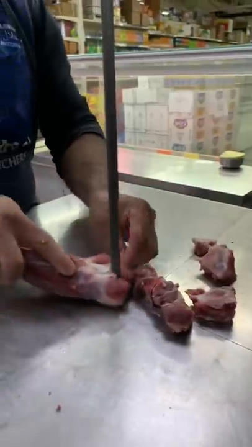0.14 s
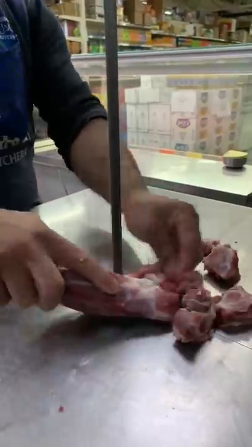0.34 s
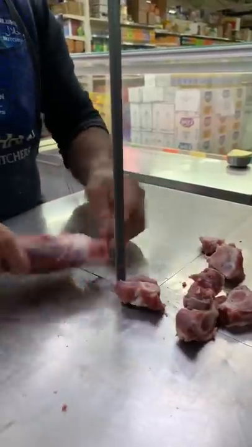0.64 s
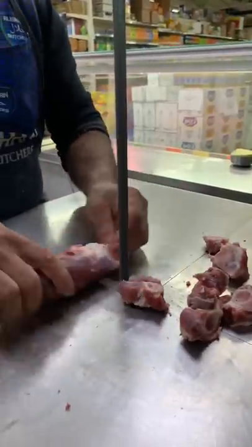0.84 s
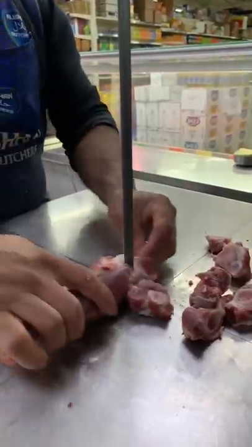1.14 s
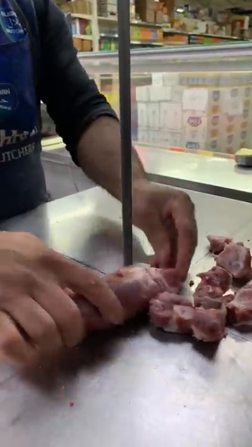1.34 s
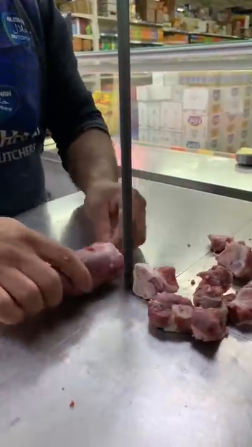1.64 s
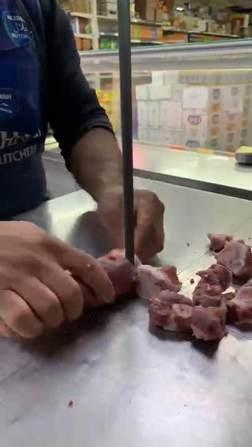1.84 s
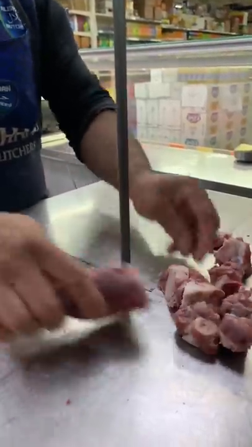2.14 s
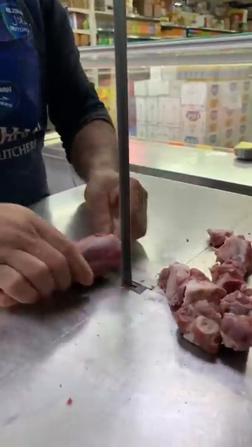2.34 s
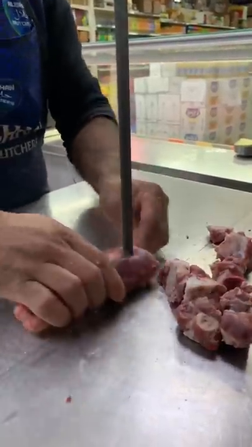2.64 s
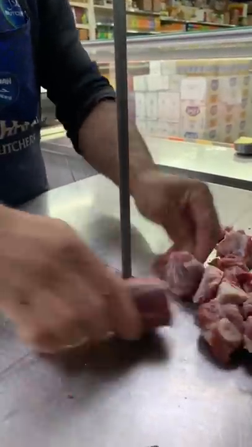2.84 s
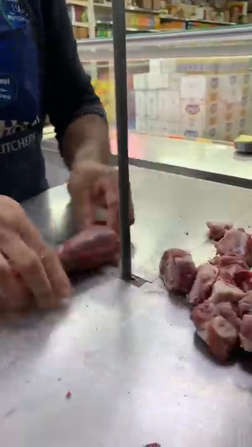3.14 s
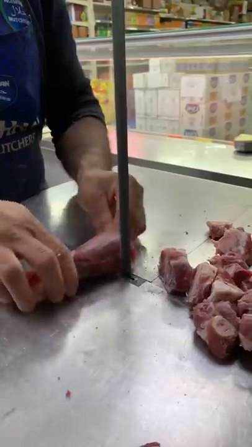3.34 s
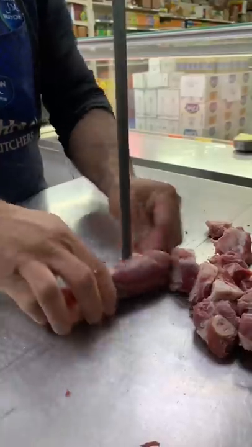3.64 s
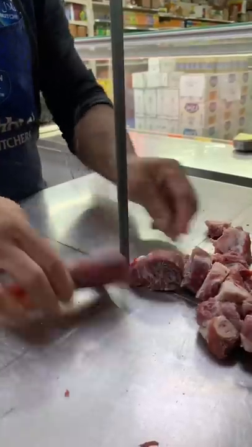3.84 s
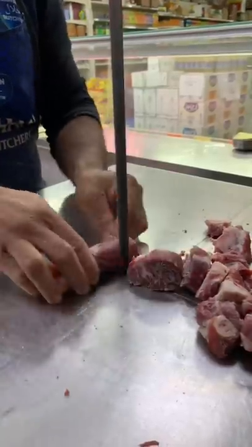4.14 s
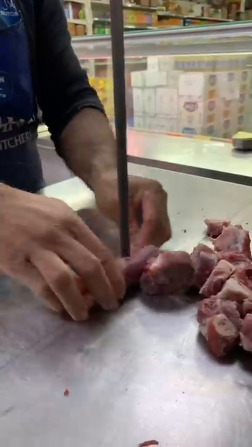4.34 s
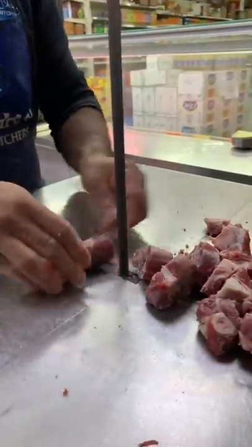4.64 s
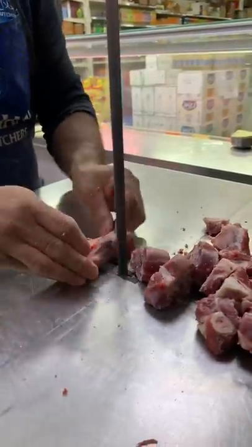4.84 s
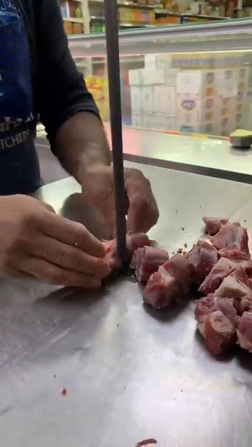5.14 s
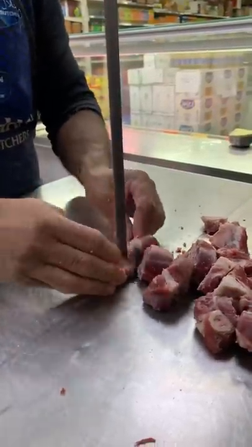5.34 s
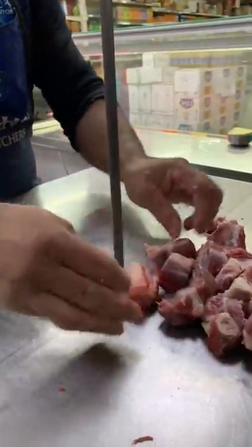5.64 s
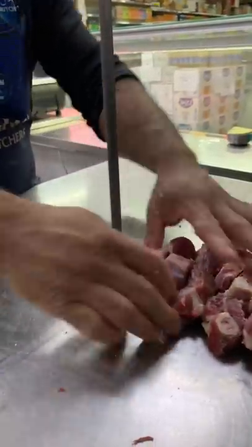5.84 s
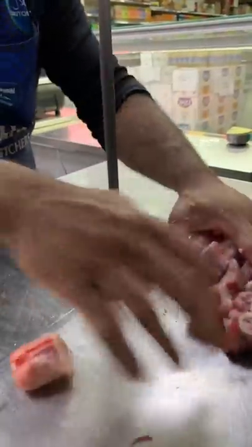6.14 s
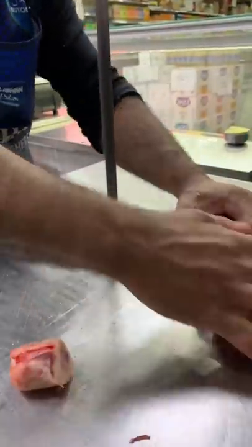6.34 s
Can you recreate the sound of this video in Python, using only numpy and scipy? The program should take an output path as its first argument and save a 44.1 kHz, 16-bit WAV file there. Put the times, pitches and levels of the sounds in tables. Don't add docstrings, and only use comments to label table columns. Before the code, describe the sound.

A butcher's band saw is already running close to the microphone. Its low motor hum and rumble carry a rapidly pulsing blade hiss and irregular metallic ticks. Seven brief cuts follow roughly every three quarters of a second, each a harsh, bright rasp with a buzzing, ringing tone. The motor sags slightly each time, then recovers; the last stretch is the saw running free.

```python
import sys
import numpy as np
from scipy import signal
from scipy.fft import rfft, irfft
from scipy.io import wavfile
from scipy.ndimage import uniform_filter1d

SR = 44100
rng = np.random.default_rng(int(sys.argv[2]) if len(sys.argv) > 2 else 0)


def unload_wav(signal):
    wavfile.write(
        sys.argv[1],
        SR,
        np.round(np.clip(np.atleast_2d(signal).T, -1, 1) * 32767).astype(np.int16),
    )


def ratio(d):
    e = np.asarray(d, float) / 20
    return 10 ** e


N = 285768
t = np.arange(N) / SR


def evened(x):
    return x / np.sqrt(np.mean(abs(x) ** 2) + 1e-20)


def curve(table):
    seconds, values = np.transpose(table)
    return np.interp(t, seconds, values)


def bell(at, width):
    return np.exp(-((t - at) / width) ** 2 / 2)


def drift(hz):
    f = np.fft.rfftfreq(N, 1 / SR)
    return evened(irfft(rfft(rng.standard_normal(N)) / (1 + (f / hz) ** 2), N))


def split(x, hz):
    dull = signal.sosfilt(signal.butter(2, hz, fs=SR, output="sos"), x)
    return dull, x - dull


# pitch in Hz, width in Hz, strength in dB.
FRAME_RINGS = [(1028, 28, 7.5), (1166, 60, 6), (1280, 14, 5.5), (1655, 56, 5), (1953, 66, 6.5),
               (2396, 140, 7), (2536, 69, 8.5), (2680, 41, 8.5), (3117, 144, 7), (3595, 124, 3.5),
               (4236, 73, 8)]


def noise(points, ring=0):
    hz = np.fft.rfftfreq(N, 1 / SR)
    f, db = np.transpose(points)
    rings_db = sum(peak / (1 + (2 * (hz - at) / width) ** 2) for at, width, peak in FRAME_RINGS)
    shape = ratio(np.interp(np.log(hz + 1), np.log(f), db) + ring * rings_db)
    return evened(irfft(rfft(rng.standard_normal(N)) * shape, N))


# frequency in Hz, lead in half turns of the wave.
LEFT_LEAD = [(0, 0), (300, .02), (900, .3), (1350, .05), (2000, .7), (2600, .9), (3600, .65), (4000, .85),
             (4350, .78), (4950, 1), (7000, 2), (9800, 3), (12250, 4), (15200, 5), (16500, 5.3)]
# frequency in Hz, likeness from 0 to 1.
LIKENESS = [(0, .985), (400, .975), (650, .3), (1200, .8), (1900, .45), (2500, .7), (3500, .45), (4100, .8),
            (5000, .85), (5800, .92), (15000, .96)]


def ports(x):
    hz = np.fft.rfftfreq(N, 1 / SR)
    same = np.clip(np.interp(hz, *np.transpose(LIKENESS)), 0, 1)
    direct = same * np.exp(-1j * np.pi * np.interp(hz, *np.transpose(LEFT_LEAD)))
    echo = rng.standard_normal(8000) * ratio(-60 * t[:8000] / 0.25)
    scatter = np.sqrt(1 - same ** 2) * rfft(echo / np.linalg.norm(echo), N)
    return np.array([x, irfft(rfft(x) * (direct + scatter), N)])


# slowest moment in seconds, loss in turns a second.
SAGS = [
    (.318, .372),
    (1.21, .257),
    (1.955, .302),
    (2.724, .261),
    (3.62, .274),
    (4.358, .221),
    (5.358, .169),
]


def sag():
    return sum(loss * bell(at, .104) for at, loss in SAGS)


# time in seconds, push against the blade in dB.
PUSHES = [
    [(.04, -4), (.07, -4), (.09, 7), (.13, 8.5), (.176, 16), (.21, -14), (.23, 2), (.29, 0.5)],
    [(.974, -14), (1.022, 8), (1.05, 10.5), (1.095, 10), (1.115, 8), (1.17, 7), (1.212, 11.5), (1.232, -22)],
    [(1.7, -2), (1.745, -1.5), (1.762, 9), (1.79, 8.5), (1.83, 10.5), (1.845, 11), (1.875, 16.5), (1.9, 10),
     (1.932, 3), (1.99, -10)],
    [(2.46, -8), (2.518, 1.5), (2.632, 10), (2.648, 14), (2.712, -8), (2.74, -13)],
    [(3.35, -18), (3.368, -1), (3.432, -1), (3.458, 0), (3.5, 5.5), (3.57, 9.5), (3.664, -5), (3.69, -26)],
    [(4.11, -7.5), (4.196, 4.5), (4.272, 2), (4.308, 7), (4.344, 12), (4.382, -4), (4.395, -18)],
    [(5.03, -6), (5.074, -3), (5.158, -4), (5.226, 3.5), (5.31, 4.5), (5.34, 11), (5.406, 10), (5.414, -17)],
]


def contact():
    return uniform_filter1d(sum(1. * (t > c[0][0]) * (t < c[-1][0]) for c in PUSHES), 600)


def tooth_tone(turns, k, blur_hz, swing_db):
    teeth_per_turn = 74.4
    uneven = (.5 + 0.44 * (drift(blur_hz) + 1j * drift(blur_hz))) * ratio(swing_db * drift(3.2))
    return evened(uneven * np.exp(2j * np.pi * k * teeth_per_turn * turns))


TOOTH_DB = [-6, 0, -1, -1, -1, 2.5]
# frequency in Hz, level in dB.
GRIT = [(1000, -54), (2400, -12.5), (4600, 3.5), (7000, 8), (8000, 8), (9900, 2), (11500, 10.5),
        (13500, 8.5), (14700, 17), (15700, -1)]
# frequency in Hz, level in dB.
JUDDER = [(1200, -13), (1700, -4), (3000, -6), (4200, 5.5), (5600, 4.5), (7000, -11.5)]


def rasp(turns, level, first, second, top_db):
    tones = 0
    for i, db in enumerate(TOOTH_DB):
        tones = tones + ratio(db) * tooth_tone(turns, i + 3, 65, 2.2 if i == 1 else 5.0).real
    tones = evened(tones)
    tones /= np.sqrt(uniform_filter1d(tones ** 2, size=1500))
    grit = noise(GRIT, 0.91) * ratio(2.2 * drift(750))
    high = level * ratio(3.0 * drift(51)) * (ratio(-3.5) * tones + ratio(-2.5) * grit)
    dull, bright = split(high, 9800)
    high = dull * ratio(-.8 * (top_db + 8.0)) + bright * ratio(top_db + 3.0)
    first_sides = np.array([[.8], [1.4 * np.exp(-1.5j)]])
    second_sides = np.array([[1.2], [1.1 * np.exp(-.9j)]])
    low = first * tooth_tone(turns, 0.99, 62, 5.2) * first_sides
    low = low + second * tooth_tone(turns, 2, 130, 1.5) * second_sides
    judder = ratio(-4.0) * (first + .6 * second) * noise(JUDDER, 1.8) * ratio(2.9 * drift(36))
    return ports(high + judder) + low.real


# middle in seconds, half width in seconds, lift in dB.
BONES = [(.1, 0.073, 12.5), (.24, 0.022, 19.5), (1.01, 0.04, 22.5), (1.14, 0.043, 19.5), (1.742, 0.074, 24),
         (1.93, 0.014, 4), (2.62, 0.091, 8), (3.582, 0.041, 8.5), (4.18, 0.025, 8.5), (4.33, 0.02, 16),
         (5.1, 0.046, 20), (5.3, 0.024, 5)]
# second tooth tone in dB, share of the top in dB.
PIECES = [
    (-10.5, -3.5),
    (-10.5, -1.5),
    (-13.5, -3.5),
    (-10.5, -6),
    (-6, -5),
    (-10, -5.5),
    (-8.5, -4),
]


def cuts(turns, touching):
    def above(db, idle_db):
        extra = np.maximum(ratio(db) ** 2 - ratio(idle_db) ** 2, 0)
        return touching * np.sqrt(extra) * ratio(-25.0)

    push_db = curve(sum(PUSHES, []))
    bone_db = -25 + sum(db * bell(at, width) for at, width, db in BONES)
    piece = np.searchsorted([c[0][0] - .1 for c in PUSHES[1:]], t)
    second_db, top_db = np.transpose(PIECES)[:, piece]
    level = above(push_db, -7.5)
    first = above(push_db + bone_db, -24.5)
    second = above(0.49 * push_db + second_db, -14.5)
    return rasp(turns, level, first, second, top_db)


# time in seconds, slap depth in dB.
SLAP = [(0, 9.5), (.4, 5.5), (.95, 9), (1.4, 3), (2.3, 6.5), (3.25, 7.5), (4.05, 7), (4.6, 5.5), (5.1, 5.5),
        (5.55, 3), (5.75, 4), (6.4, 7)]
# frequency in Hz, level in dB.
HISS = [(2500, -25), (4200, -6), (5300, -4), (6500, -1), (8500, 1), (9200, -4), (10300, -8), (11500, -3),
        (12500, -4), (12950, -6), (13600, 3), (14100, 0), (14700, 1), (15700, -1)]


def blade(turns, load, touching):
    shape = [(0.67, 1.71, 0.32), (.785, 0.86, 0.27), (0.01, 0.19, 0.14)]
    slaps = 0
    for at, size, fade in shape:
        slaps = slaps + size * np.exp(-((turns - at) % 1) / fade) * (1 + 0.19 * drift(8.1))
    depth_db = curve(SLAP) - 0.5 * touching
    slap_db = depth_db * uniform_filter1d(slaps - .35, 20)
    level_db = -34 - 4 * load
    dull, bright = split(noise(HISS) * ratio(level_db + 1.9 * drift(190)), 5500)
    return dull * ratio(1.34 * slap_db) + bright * ratio(0.95 * slap_db)


# time in seconds, peak in dB.
TICKS = [(0.472, -39), (0.5125, -36), (0.5516, -33), (0.753, -25), (0.795, -20), (0.956, -26),
         (1.1684, -32), (1.8386, -15), (2.0052, -21), (2.544, -31), (2.645, -15), (2.7691, -27),
         (2.8893, -22), (3.209, -21), (3.461, -15), (3.934, -33), (3.9775, -25), (4.0968, -18.5),
         (4.292, -20), (4.4179, -27), (4.501, -24), (5.1986, -22), (5.5008, -23.5), (5.5414, -20.5),
         (5.863, -18), (6.0218, -20.5), (6.064, -20.5), (6.2646, -23), (6.304, -19), (6.4643, -29)]


def ticks():
    hits = np.zeros(N)
    for s, db in TICKS:
        hits[round(s * SR)] = ratio(db + 4)
    return noise(HISS) * signal.oaconvolve(hits, np.exp(-t[:600] / 0.0026))[:N]


# multiple of the shaft speed, rms in dB, left port's lead in radians.
ORDERS = [(4, -55.6, -0.1), (5, -40.6, -0.1), (7, -46.2, -0.1), (8, -47.7, -0.2), (10, -49.1, -0.1),
          (11, -40.1, -0.1), (12, -55.5, -0.4), (17, -37.3, 0.8), (20, -56.3, 0.8), (21, -55.5, 0.7),
          (23, -56.4, -1.2), (24, -48.4, 2.8), (26, -54.9, -1.9), (27, -56.9, 0.5), (28, -52.7, 2.5),
          (34, -60.5, 0.9), (37, -53, 0.9), (38, -58.4, 2.1), (47, -53.2, -0.1), (48, -56.7, -0.3),
          (49, -55.9, 0.2), (53, -54.7, 0.1), (54, -54.5, -0.2), (55, -54.1, -0.9), (57, -54.6, 0.1),
          (79, -53.3, 3.0), (94, -53.5, 3.0), (108, -55.1, 1.4), (123, -50.3, 2.7), (124, -52.2, -3.1)]
# start in seconds, end in seconds, multiple, rms in dB.
SURGES = [(1.44, 1.74, 41, -38.5), (2.1, 3.5, 37, -50), (6.4, 6.3, 37, -45.5), (5.95, 6.4, 79, -45),
          (5.907, 7.7, 47, -47.5), (2.13, 2.65, 55, -45), (0.44, .95, 37, -51), (4.5, 5.0, 37, -51),
          (5.8, 6.1, 113, -48), (5.8, 6.2, 123, -57)]
# time in seconds, drone in dB.
DRONE = [(0, -2.5), (.1, -3.5), (.43, -5), (.97, -2), (1.2, -8), (1.45, -5), (1.72, -2), (1.85, -10),
         (2.15, -8.5), (2.36, -20), (2.47, -2), (3.0, -18), (3.28, -5.5), (3.81, -10.5), (4.2, -4.5),
         (5.02, -7.5), (5.5, -12.5), (5.8, -6)]
# time in seconds, buzz in dB.
BUZZ = [(0, -36.5), (.5, -32.5), (1.0, -33), (1.6, -37.5), (2.6, -39.5), (3.9, -38.5), (5.0, -40.5),
        (5.8, -40.5), (6.48, -41.5)]


def hum(turns, load):
    own_db = {5: curve(DRONE) - 20 * load - 32.0,
              11: curve(BUZZ) - 4.5 * load + 1.44 * drift(18),
              17: -4.5 + 11.5 * load - 31.5}
    own_start = {5: 0, 11: .25, 17: 0}
    out = np.zeros((2, N))
    for order, db, lead in ORDERS:
        level = ratio(own_db.get(order, db + 0.11 + 3.77 * drift(8.1)))
        start = own_start.get(order, rng.random())
        out += level * np.cos(2 * np.pi * (order * turns + start) - np.array([[0], [lead]]))
    for start, end, order, db in SURGES:
        ring = uniform_filter1d(1. * (t > start) * (t < end), 3000) * ratio(db + 3.7 * drift(54))
        out += ring * np.cos(2 * np.pi * order * turns + 0.58 * drift(10.0) - np.array([[0], [.9]]))
    return np.sqrt(2) * out


# frequency in Hz, level in dB.
RUMBLE = [(28, -42), (45, -12), (80, -1.5), (120, 1.5), (250, -6.5), (420, -6.5), (600, -4.5), (800, -11.5),
          (1250, -6.5), (2100, -6.5), (3000, -7), (4200, -7.5), (6000, -12.5)]


def rumble(turns, load):
    shake = noise(RUMBLE, 0.97)
    one_turn = np.r_[shake[:1768], shake[0]]
    repeated = np.interp(turns % 1 * 1768, np.arange(1769), one_turn)
    steady = ratio(-42 + 3.5 * drift(0.53)) * repeated
    loose = ratio(-34.5) * noise(RUMBLE, 1.25) * ratio(4.4 * np.tanh(drift(32)))
    return ratio(1.84 + 4 * load) * (steady + loose)


def scene():
    load = sag()
    turns = np.cumsum(24.945 - load) / SR
    touching = contact()
    bites = cuts(turns, touching)
    idle = rumble(turns, load) + blade(turns, load, touching)
    return hum(turns, load) + ports(idle) + bites


# time in seconds, gain in dB.
REST = [(0, -30.5), (.7, -33.5), (1.7, -31.5), (2.3, -33), (3.2, -34), (3.45, -34.5), (4.1, -32.5),
        (5.1, -33.5), (5.6, -31.5), (6.48, -32.5)]
# start in seconds, letting go in seconds, depth in dB,
# climb back in seconds.
DUCKS = [
    (0.113, 0.271, -11.5, 0.17),
    (1.04, 1.267, -10, 0.15),
    (1.786, 1.994, -8, 0.063),
    (2.555, 2.7, -1.5, 0.11),
    (3.519, 3.64, -4.5, 0.12),
    (4.16, 4.403, -2.5, .16),
    (5.325, 5.416, -10, 0.14),
]


def recorder_db():
    gain_db = curve(REST)
    for start, end, depth_db, climb in DUCKS:
        sink = 1 - np.exp(-np.maximum(t - start, 0) / .045)
        gain_db = gain_db + depth_db * sink * np.clip(1 - (t - end) / climb, 0, 1)
    return gain_db


def thinned(x):
    hz, s, z = signal.stft([x[0] + x[1], x[0] - x[1]], SR, nperseg=2048)
    hz = hz[:, None]
    power = np.repeat(np.add.reduceat(abs(z) ** 2, np.arange(0, 1025, 8), axis=1), 8, axis=1)[:, :1025]
    power = np.where(hz > 5500, uniform_filter1d(power, size=24, axis=1), power)
    margin_db = np.interp(hz, [2000, 3800, 4200, 5500, 6500, 15000], [9, 9, 8.5, 10.5, 6.5, 6.])
    margin_db = margin_db + 1.7 * np.interp(s, t, drift(14))
    masked = power < power[:, hz[:, 0] > 5500].mean((0, 1)) * ratio(-11.5) ** 2
    weak = ((power < power[::-1] / ratio(margin_db) ** 2) | masked) & (hz > 1900)
    tick_moments = [round(at * SR / 1024) for at, db in TICKS]
    sharp = np.isin(np.arange(len(s)), tick_moments) & (rng.random(len(s)) < .5)
    sharp |= rng.random(len(s)) < (np.interp(s, *np.transpose(SLAP)) - 6.3) / 8
    z *= (~weak | sharp) * (hz < 15800)
    both, apart = signal.istft(z, SR, nperseg=2048)[1][:, :N]
    return np.array([both + apart, both - apart]) / 2


def band_limit(x):
    return signal.sosfilt(signal.butter(12, 15750, fs=SR, output="sos"), x)


def record(dry):
    ducked = dry * ratio(recorder_db() + 31.5)
    mix = thinned(ducked + ports(ticks()))
    return band_limit(mix)


dry = scene()
out = record(dry)
unload_wav(out)
```